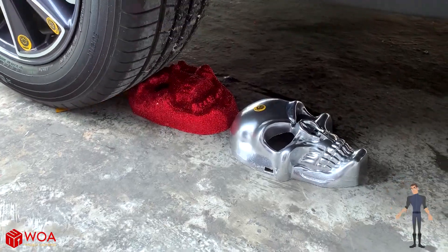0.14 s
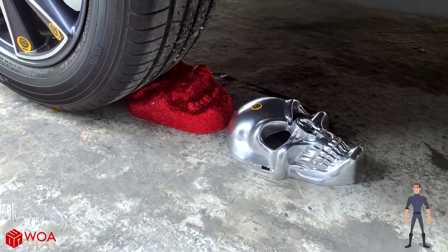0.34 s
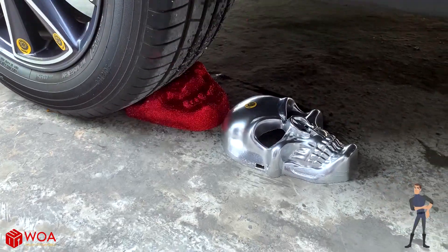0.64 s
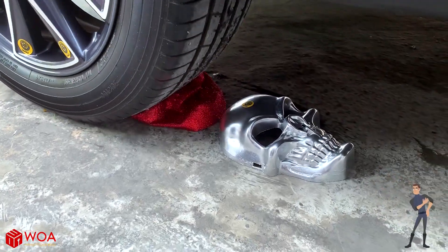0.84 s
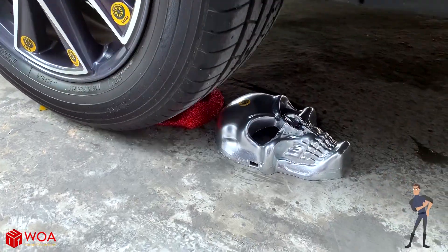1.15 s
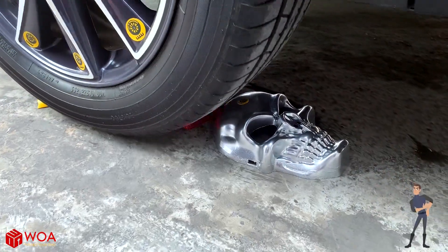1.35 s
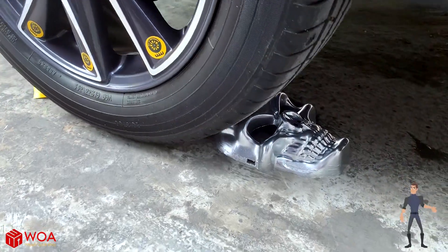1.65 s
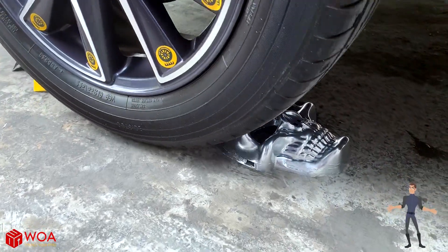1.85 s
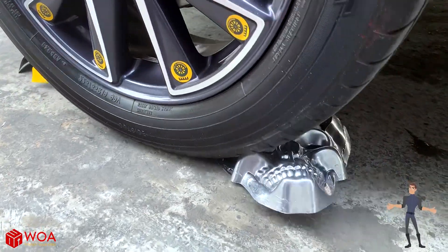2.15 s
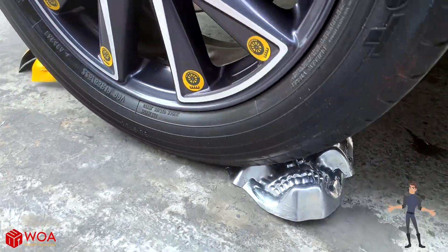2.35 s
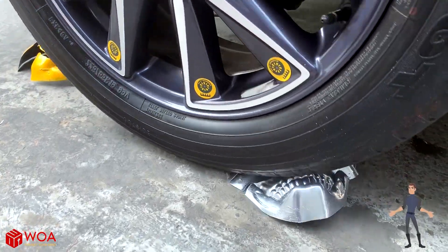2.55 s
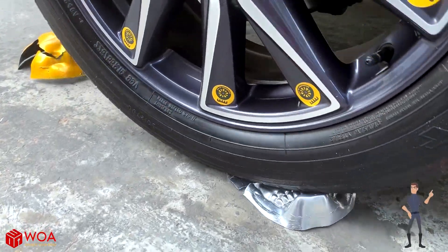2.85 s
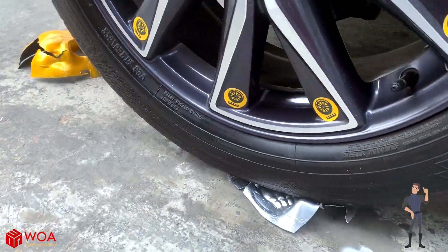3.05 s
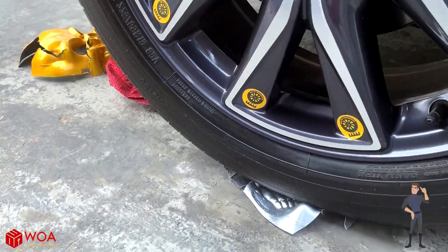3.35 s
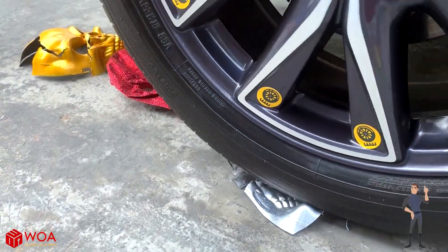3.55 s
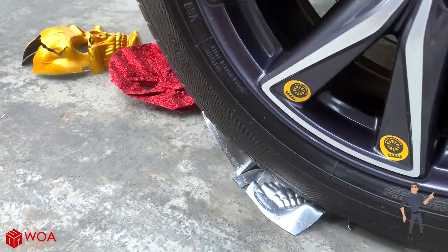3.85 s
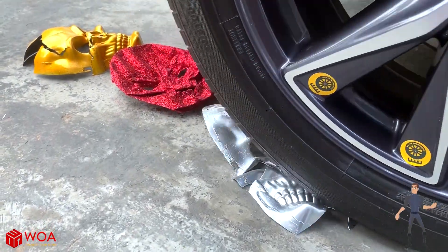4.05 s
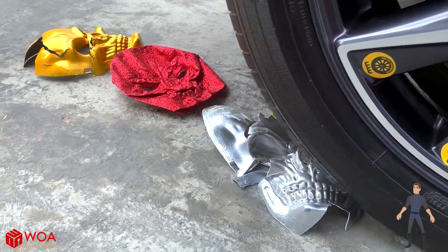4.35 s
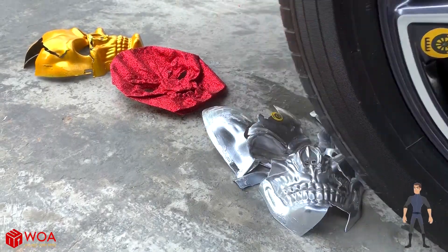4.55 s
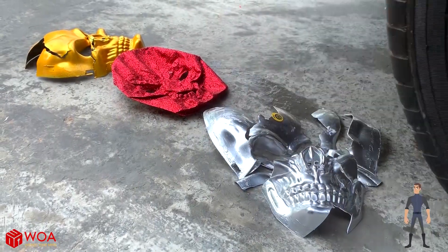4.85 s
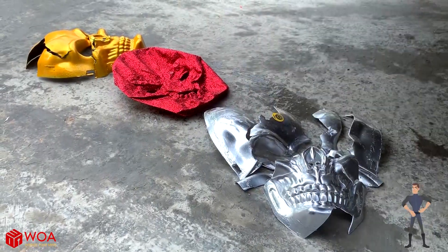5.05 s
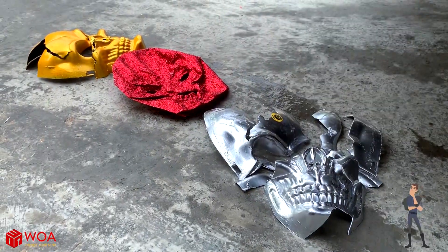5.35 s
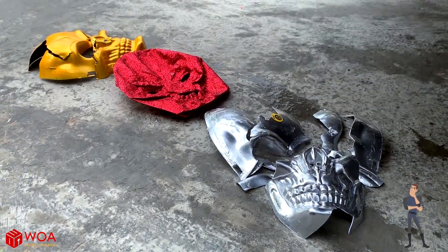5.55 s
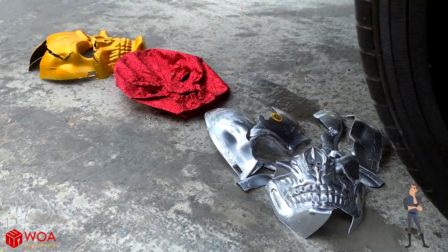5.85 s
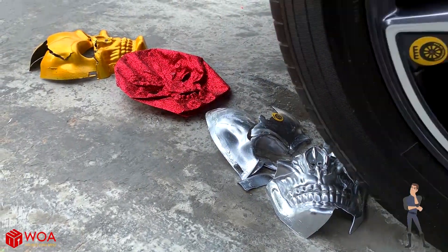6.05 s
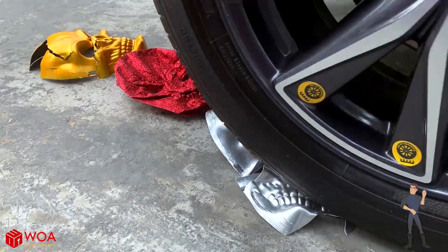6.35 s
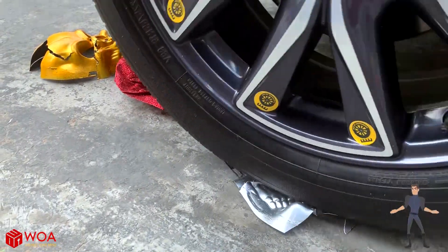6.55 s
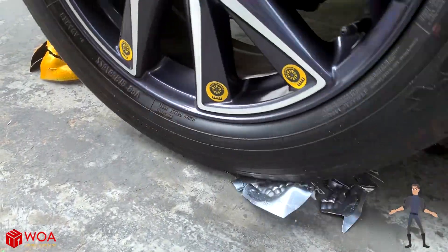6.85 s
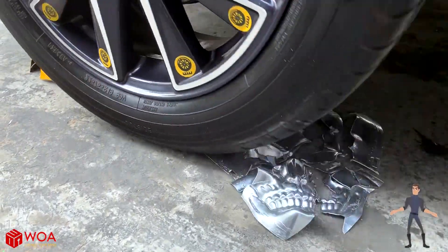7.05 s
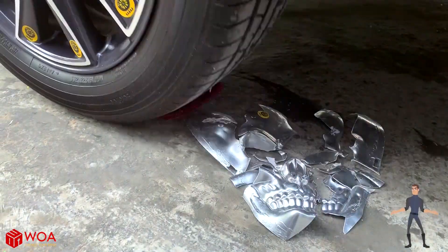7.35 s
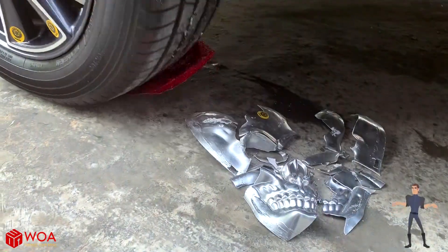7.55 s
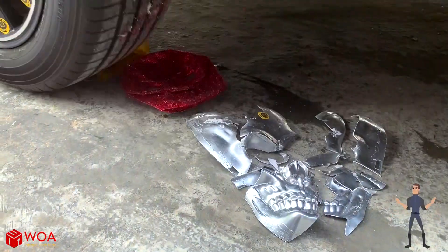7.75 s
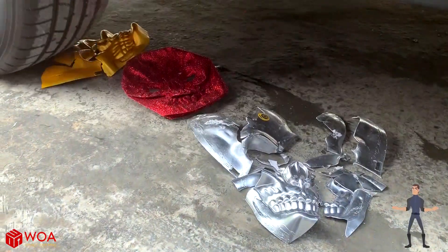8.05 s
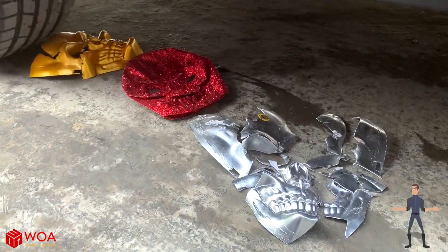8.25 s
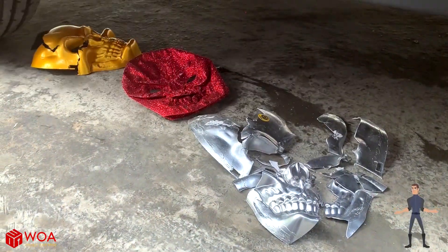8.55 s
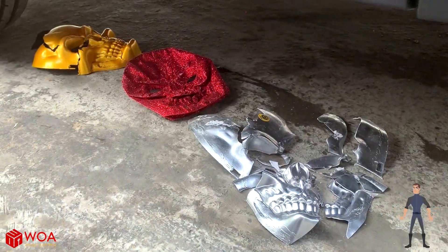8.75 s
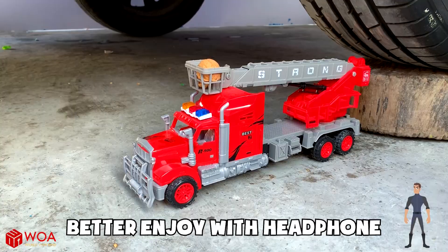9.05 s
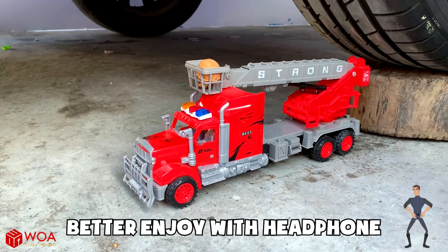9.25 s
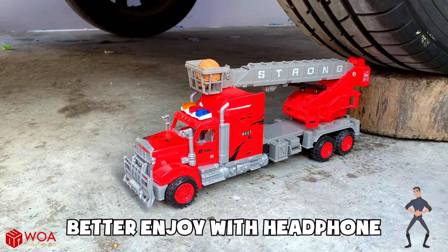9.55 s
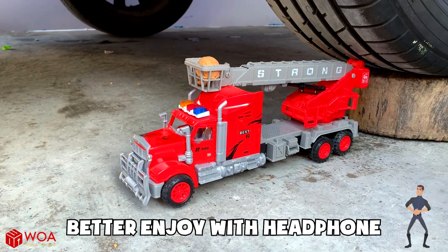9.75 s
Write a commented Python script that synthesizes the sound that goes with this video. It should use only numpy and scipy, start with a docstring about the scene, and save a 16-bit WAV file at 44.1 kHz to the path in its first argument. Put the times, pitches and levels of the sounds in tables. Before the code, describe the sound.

From 0 s a low pulsing car engine idles, rising slightly in speed, while a tyre presses hollow plastic close to the microphone: irregular pops, snaps and gritty crunching on concrete. At about 1.75 s the breaking surges, with dull collapsing thuds, a hollow tyre boom and loud, slightly overloaded cracks near 2 s. After a brief lull at 2.2 s, sharper splintering and crunching continue from 2.4 to 3.4 s. Then only sparse faint ticks remain to about 4.4 s as the engine recedes. It swells again from 5 s, with a soft low thud at 5.5 s. From 6.2 to 8 s the tyre reverses over flattened pieces: brighter crackles, grinding and short falling scrapes. The engine slows and fades around 8.3 s, with last small crumbs. At 9.03 s the level dips momentarily; quiet hiss, weak idle and a thin steady hum follow, with a faint crumble near 9.75 s.

```python
"""A car with its engine idling creeps over hollow plastic masks on a concrete floor, close by: damped rings and noise
bursts make shells snap and pop, random grains crunch under the tread, and a wavering tone booms in the tyre.
It pauses: the breaking thins out and the engine, a stack of firing harmonics over rumble, draws away and returns.
It reverses over the pieces, with brighter cracks and gliding scrapes, and the loudest peaks of the scene overload.
The engine slows and sags, the level dips briefly, a thin hum joins the hiss, and a last faint crumble follows."""
import sys
import numpy as np
from scipy import signal
from scipy.fft import rfft, irfft, next_fast_len
from scipy.io import wavfile
from scipy.ndimage import map_coordinates

SR = 44100
rng = np.random.default_rng(int(sys.argv[2]) if len(sys.argv) > 2 else 0)


def bounce(signal):
    """Save signal as a 16-bit WAV file at the path given by the first command-line argument."""
    frames = np.transpose(np.atleast_2d(signal))
    limited = np.clip(frames, -1, 1)
    pcm = np.round(limited * 32767).astype(np.int16)
    wavfile.write(sys.argv[1], SR, pcm)


N = 437472


def amp(db):
    """Decibels to gain."""
    return 10 ** (np.asarray(db) / 20)


def unit(x):
    """Scaled to rms 1."""
    return x / np.sqrt(np.mean(x ** 2) + 1e-20)


def along(points, hz):
    """(Hz, value) points read on a log frequency axis."""
    point_hz, value = np.transpose(points)
    return np.interp(np.log(hz + 1), np.log(point_hz + 1), value)


def curves(rows, outside=None):
    """One value per sample for each column after the time."""
    s, *columns = np.transpose(rows)
    return [np.interp(np.arange(N) / SR, s, column, outside, outside) for column in columns]


def wobble(rate):
    """A smooth random curve, rate knots a second."""
    knots = rng.standard_normal(int(N * rate / SR) + 4)
    return map_coordinates(knots, [np.arange(N) * rate / SR])


def filtered(x, response):
    """x times a response of frequency."""
    size = next_fast_len(N + 8192)
    return irfft(rfft(x, size) * response(np.fft.rfftfreq(size, 1 / SR)), size)[..., :N]


def coloured(x, spectrum):
    """x shaped by a (Hz, dB) spectrum, at rms 1."""
    return unit(filtered(x, lambda hz: amp(along(spectrum, hz))))


def pair(side_db):
    """White stereo noise with the given side level against the mid."""
    mid, side = rng.standard_normal((2, N))
    return unit(np.array([mid + amp(side_db) * side, mid - amp(side_db) * side]))


def burst(x):
    """Scaled to the energy of 10 ms at rms 1."""
    energy = np.sum(np.mean(np.atleast_2d(x) ** 2, axis=0))
    return x * np.sqrt(SR / 100 / (energy + 1e-20))


def add(track, s, x):
    """Mix x into the track from time s."""
    i = max(round(s * SR), 0)
    track[:, i:i + x.shape[-1]] += x[..., :N - i]


# background air: start_s, hiss_db, sizzle_db
AIR_LEVELS = [(0, -32, -81.5), (4.2, -51, -87.5), (5.37, -45.5, -93), (5.41, -57.5, -99),
              (5.66, -46.5, -93), (6.2, -43, -76.5), (8.4, -41.5, -67.5), (9.03, -42, -62.5),
              (9.07, -41.5, -57), (9.92, -41.5, -57.5)]
# colour of the hiss: freq_hz, density_db_per_hz
HISS_COLOUR = [(300, 11), (700, 4.5), (1100, 1), (2200, -1.5), (2950, -3.5), (3250, 0), (3600, -5),
               (5500, -9), (7400, -12), (9200, -7), (10500, -16), (12000, -47.5)]
# colour of the high sizzle: freq_hz, density_db_per_hz
SIZZLE_COLOUR = [(7000, -20), (9500, 4.5), (13000, 23), (15000, 18.5), (16000, -12.5)]
HUM_START_S, HUM_DB = 9.06, -49.5


def air(ticking=0.2):
    """A faint hiss and a high sizzle flutter at the engine's firing rate, joined at the end by a thin hum."""
    t = np.arange(N) / SR
    hiss, sizzle = curves(AIR_LEVELS)
    turns = np.cumsum(curves(FIRING_RATE)[0]) / SR
    flutter = pair(0.57) * (1 + ticking * np.cos(2 * np.pi * turns))
    hum = unit(np.sin(2 * np.pi * 597.5 * t + .3 * wobble(8)))
    noise = amp(hiss) * coloured(flutter, HISS_COLOUR) + amp(sizzle) * coloured(flutter, SIZZLE_COLOUR)
    return noise + amp(HUM_DB) * (t > HUM_START_S) * hum


# engine speed: start_s, firing_rate_hz
FIRING_RATE = [(0, 20.5), (.38, 22.1), (.6, 23.4), (5.7, 23.3), (6.3, 23.0), (7.9, 20.5), (8.45, 17.9),
               (8.95, 19.1), (9.2, 18.4), (9.92, 18.6)]
# the engine comes nearer and draws away: start_s, relative_level_db
ENGINE_LEVEL = [(0, -26), (.3, -26), (.8, -24.5), (1.8, -24), (2.4, -25), (3.2, -31), (4.0, -36.5),
                (5.4, -29.5), (5.7, -26), (6.4, -25.5), (6.95, -23.5), (7.6, -26.5), (8.3, -36),
                (8.55, -34), (8.95, -34.5), (9.2, -37.5), (9.92, -37)]
# firing harmonics: multiple of the firing rate, relative_level_db
HARMONICS = [(1, 1), (2, -4.5), (3, -4), (4, -13), (5, -7), (6, -11.5), (7, -18.5), (8, -19.5), (9, -23),
             (10, -27), (11, -24), (12, -30), (13, -38.5), (14, -27), (15, -24.5), (16, -25.5)]
# resonances that boom as a harmonic passes through, two in the exhaust and one in the air of the rolling tyre:
# centre_hz, half_width_hz, lift_db (added gain)
BOOMING_RESONANCES = [(95.66, 2.92, 12), (107.25, 3.8, 11.5), (185.4, 6, 5)]
# colour of the noise between the harmonics: freq_hz, density_db_per_hz
RUMBLE_COLOUR = [(12, -30), (30, -1), (110, 0), (150, -2), (250, -6), (400, -11), (600, -17), (1200, -28),
                 (4000, -55)]


def engine(throb_db=-2, rumble_db=-8, rolling_db=-3, floor_db=-40, unsteady_db=1.5, pulsing=0.19, smear=1.0):
    """Firing harmonics, lifted by the exhaust and tyre resonances, and a pulsing rumble that grows as the tyre
    labours."""
    level, = curves(ENGINE_LEVEL)
    rate = curves(FIRING_RATE)[0] * (1 + 0.0038 * wobble(11))
    phase = 2 * np.pi * np.cumsum(rate) / SR

    def tone(k):
        """One harmonic with its own phase and unsteady level."""
        return np.sqrt(2) * np.sin(k * phase + rng.normal(0, smear)) * amp(unsteady_db * wobble(5))

    def lift(hz):
        """Gain of the exhaust and tyre resonances at a frequency."""
        return 1 + sum(amp(db) / (1 + ((hz - centre) / width) ** 2) ** 2
                       for centre, width, db in BOOMING_RESONANCES)

    tones = amp(level + throb_db) * sum(amp(db) * lift(k * rate) * tone(k) for k, db in HARMONICS)
    rolling = amp(crush()[0] + rolling_db)
    rumble = np.sqrt(amp(level + rumble_db) ** 2 + rolling ** 2 + amp(floor_db) ** 2)
    noise = rumble * coloured(pair(-14) * (1 + pulsing * np.cos(phase)), RUMBLE_COLOUR)
    return (tones + noise) * amp([[-.7], [.7]])


# jolts that set the air in the tyre ringing: start_s, level_db (before swell and decay)
TYRE_JOLTS = [(.06, -27), (1.79, -24), (2.87, -19.5)]
# swell, decay, steady ring relative to the load
CAVITY_RISE_S, CAVITY_FALL_DB_PER_S, CAVITY_TREAD_DB = 0.015, 34, -21.5


def tyre(cavity_hz=198.3):
    """Jolts from the tread excite the ring of air inside the tyre, which swells and dies away."""
    t = np.arange(N) / SR
    ring = amp(crush()[0] + CAVITY_TREAD_DB)
    for s, db in TYRE_JOLTS:
        age = np.maximum(t - s, 0)
        jolt = amp(db - CAVITY_FALL_DB_PER_S * age) * (1 - np.exp(-age / CAVITY_RISE_S))
        ring = np.hypot(ring, jolt)
    boom = np.sin(2 * np.pi * cavity_hz * t + .3 * wobble(8)) * amp(1.2 * wobble(10))
    return ring * unit(boom)


# dull thuds as a dome collapses or the tyre settles: start_s, pitch_hz, burst_level_db, decay_s
THUDS = [(.228, 483, -10, .0023), (.399, 316, -17.5, .0028), (1.862, 584, -1.5, .0046),
         (1.962, 140, -8.5, .018), (1.98, 156.5, -12, .022), (2.005, 215, -10.5, .017),
         (2.634, 274, -18.5, .011), (2.789, 288, -23.5, .0068), (3.168, 298, -9, .0031),
         (5.53, 72, -19, .03)]


def thumps():
    """A collapsing dome or settling tyre gives a dull, quickly damped thud."""
    out, t = np.zeros((2, N)), np.arange(SR // 6) / SR
    for s, hz, db, decay_s in THUDS:
        swell = (1 - np.exp(-3 * t / decay_s)) * np.exp(-t / decay_s)
        add(out, s, amp(db) * burst(np.sin(2 * np.pi * hz * t) * swell))
    return out


# loose pieces skidding on the concrete: start_s, length_s, first_hz, last_hz, level_db
SKID_GLIDES = [(1.764, .03, 1370, 1150, -21.5), (2.901, .13, 851, 702, -27.5),
               (7.134, .089, 2600, 2000, -33), (7.344, 0.12, 1700, 1120, -31),
               (7.352, 0.079, 717, 471, -27), (7.841, 0.086, 2930, 2510, -43), (8.197, .06, 1060, 744, -46),
               (8.279, .07, 2400, 1960, -45), (8.315, .06, 1336, 1160, -47)]


def skids(width_hz=260):
    """A dragged piece rubs up a rough resonance that sinks as the piece unbends."""
    out = np.zeros((2, N))
    rub = filtered(pair(-4), lambda hz: 1 / (1 + (hz / width_hz) ** 2))
    for s, length_s, first_hz, last_hz, db in SKID_GLIDES:
        u = np.linspace(0, 1, round(length_s * SR))
        phase = 2 * np.pi * np.cumsum(first_hz * (last_hz / first_hz) ** u) / SR
        grit = rub[:, round(s * SR):][:, :len(u)]
        add(out, s, amp(db) * unit(grit * np.sin(phase) * np.sin(np.pi * u)))
    return out


# plastic crumbling and rubbing on the floor, one curve a bout: start_s, load_db, treble_db
CRUSH_BOUTS = [
    [(0, -22, -29), (.15, -26.5, -35), (.33, -29.5, -32.5), (.5, -26.5, -39), (.6, -25.5, -33),
     (.7, -33.5, -32), (.8, -23, -29.5), (.97, -29.5, -30.5), (1.12, -25, -27.5), (1.25, -25.5, -31.5),
     (1.43, -28.5, -32.5), (1.58, -31, -38.5), (1.74, -40.5, -28.5)],
    [(1.74, -29.5, -37.5), (1.88, -22, -24.5), (1.96, -15.5, -24.5), (2.06, -16.5, -22.5),
     (2.12, -33.5, -38.5), (2.26, -38.5, -47.5), (2.35, -31, -27)],
    [(2.35, -32, -44), (2.39, -27.5, -27.5), (2.5, -29, -28), (2.62, -16, -25.5), (2.71, -26.5, -21.5),
     (2.87, -21.5, -26.5), (3.02, -21.5, -39), (3.15, -28.5, -30.5), (3.27, -39, -35.5), (3.4, -54, -50.5),
     (3.55, -39.5, -49.5), (3.75, -45, -47.5), (3.95, -58.5, -57.5), (4.02, -45, -49.5),
     (4.25, -54.5, -68.5)],
    [(6.18, -52, -62), (6.28, -35, -43), (6.4, -32.5, -31.5), (6.5, -36, -45), (6.62, -34, -33.5),
     (6.77, -33, -33.5), (6.99, -29, -33), (7.18, -26, -33.5), (7.37, -28, -36.5), (7.48, -25.5, -40),
     (7.58, -30, -41.5), (7.76, -30, -45.5), (7.89, -28.5, -36.5), (8.0, -40.5, -49)],
    [(8.0, -39, -52), (8.16, -52, -62), (8.22, -39.5, -42), (8.26, -66, -58), (8.29, -39, -46),
     (8.35, -47, -48), (8.41, -58, -55)],
    [(9.72, -54, -63), (9.745, -32.5, -43.5), (9.775, -49, -58), (9.8, -32.5, -54.5), (9.87, -51.5, -63.5)],
]


def crush():
    """Load on the plastic and level of its treble, in dB for every sample."""
    return np.max([curves(bout, outside=-120) for bout in CRUSH_BOUTS], axis=0)


def creases(load, rate=170, pitch_hz=1250, spread=.5, cycles=1.6, spread_db=0.0, crease_db=-8.0):
    """Small dents click in and out, each at its own pitch."""
    count, t = int(rate * N / SR), np.arange(SR // 70) / SR
    at, tone, size = rng.random((count, 3)).T
    hz = pitch_hz * np.exp(spread * np.sqrt(3) * (2 * tone - 1))[:, None]
    sizes = amp(spread_db * np.minimum(-np.log(1 - size), 3.5))[:, None]
    clicks = sizes * np.sin(2 * np.pi * hz * t) * np.exp(-t * hz / cycles)
    where = (at * (N - len(t))).astype(int)[:, None] + np.arange(len(t))
    track = unit(np.bincount(where.ravel(), clicks.ravel(), N))
    return amp(load + crease_db) * track


# colour of the low pop, shared with the cracks: freq_hz, density_db_per_hz
POP_COLOUR = [(120, 4), (300, -4), (500, 9), (800, 10), (1300, 7), (1700, -2), (3000, -39.5)]
# colour of the middle snap, shared with the cracks: freq_hz, density_db_per_hz
SNAP_COLOUR = [(800, -7.5), (1400, 8.5), (1800, 8.5), (3000, 6), (4700, 3), (5600, -35), (8000, -41)]
# colour of the high splinters, shared with the cracks: freq_hz, density_db_per_hz
SPLINTER_COLOUR = [(3000, -18), (5000, 9), (7000, 6.5), (8300, 9), (10200, 3.5), (11400, -15.5),
                   (13000, -2.5), (15000, -20.5), (16500, -18.5)]


def crumbling(rate=330, spread_db=2.0, grain_s=0.003, rub=1.0, crunch_db=-6, crackle_db=-4, fizz_db=-1,
              slip_db=3.0):
    """Hundreds of grinding fragments a second, over the uneven rub of plastic on concrete."""
    load, treble = crush()
    sizes = (rng.random(N) < rate / SR) * amp(spread_db * np.minimum(rng.exponential(size=N), 3.5))
    grains = unit(signal.lfilter([1], [1, -np.exp(-1 / (SR * grain_s))], sizes))
    force = unit(grains + rub)

    def grind(colour, side_db):
        """Noise driven by the grinding force, slipping unevenly."""
        return unit(coloured(force * pair(side_db), colour) * amp(slip_db * wobble(35)))

    crunch = amp(load + crunch_db) * grind(POP_COLOUR, side_db=-7)
    crackle = amp(load + crackle_db) * grind(SNAP_COLOUR, side_db=0)
    fizz = amp(treble + fizz_db) * grind(SPLINTER_COLOUR, side_db=0.5)
    return creases(load) + crunch + crackle + fizz


# further fractures come by chance: most per second, then levels relative to the load or treble
LESSER_PER_S, LESSER_POP_DB, LESSER_SNAP_DB, LESSER_SPLINTER_DB = 22, 1.5, -1.5, 3
# shells that are already flat ring higher: from when, pitch ratio
FLAT_FROM_S, FLAT_PITCH = 4.5, 1.38
REFERENCE_LOAD_DB = -24  # the chance of fractures stops growing here


def lesser_cracks(load, treble, wall_hz=800, pitch_spread=0.37, spread_db=2.5, count=300):
    """Fractures drawn by chance, more and stronger as the load grows, as rows like those of PLACED_CRACKS."""
    at, luck = rng.random((count, 2)).T
    tone, pop, snap, splinter = rng.standard_normal((count, 4)).T
    i = ((np.arange(count) + at) / count * (N - 1)).astype(int)
    rate = LESSER_PER_S * np.minimum(amp(load[i] - REFERENCE_LOAD_DB), 1) ** .5
    flat_ratio = np.where(i / SR > FLAT_FROM_S, FLAT_PITCH, 1)
    pitch = wall_hz * np.exp(pitch_spread * np.clip(tone, -2, 2)) * flat_ratio
    rows = np.transpose([i / SR, pitch,
                         load[i] + LESSER_POP_DB + spread_db * pop,
                         load[i] + LESSER_SNAP_DB + spread_db * snap,
                         treble[i] + LESSER_SPLINTER_DB + spread_db * splinter])
    return list(rows[luck < rate * N / SR / count])


# shell fractures placed by hand, from loud cracks to faint ticks:
# start_s, wall_ring_hz, then relative burst levels pop_db, snap_db, splinter_db
PLACED_CRACKS = [(0.0681, 840, -6, -12, -3.5), (0.0788, 890, -5.5, -12.5, -12.5),
                 (.087, 460, -16, -20.5, -22), (.101, 333, -15, -25, -22), (.128, 790, -14.5, -32, -24),
                 (0.2062, 720, -13, -24, -59), (0.2273, 490, -13, -27, -45.5),
                 (0.2748, 890, -8.5, -11.5, -6.5), (0.5725, 940, -19, -14.5, -14.5),
                 (0.5918, 993, -5, -11.5, -10), (0.5974, 430, -15, -23, -23.5),
                 (0.6675, 460, -18, -33.5, -37.5), (0.743, 1010, -16.5, -10.5, -17.5),
                 (.7552, 780, -4, -16, -16), (0.7806, 512, -1.5, -19, -17), (0.796, 1370, -9.5, -12.5, -41),
                 (0.815, 700, -8, -13.5, -13.5), (.8548, 715, -10.5, -19.5, -24.5),
                 (0.8726, 810, -11, -14.5, -21.5), (0.908, 945, -18.5, -31, -37.5),
                 (.942, 567, -5.5, -16, -14), (1.0816, 1370, -18.5, -13, -14),
                 (1.1175, 1470, -11.5, -10.5, -21), (1.1705, 810, -11, -18.5, -32.5),
                 (1.2278, 1410, -7, -16, -22), (1.277, 1020, -15.5, -32, -22.5),
                 (1.4744, 575, -10.5, -13, -17.5), (1.5056, 545, -17, -34.5, -30),
                 (1.6107, 1430, -15, -20.5, -23), (1.692, 1290, -24.5, -18.5, -28.5),
                 (1.7342, 1050, -29, -17.5, -26.5), (1.7701, 970, -4.5, -12, -5.5),
                 (1.793, 1080, -13.5, -6.5, -10), (1.8118, 650, -9.5, -18, -1.5),
                 (1.861, 620, -7, -15, -14.5), (1.8716, 570, -17, -23, -5.5),
                 (1.8894, 870, -11, -27.5, -19.5), (1.9166, 670, -2.5, -11, -8),
                 (1.933, 585, -9.5, -19.5, -26.5), (1.9421, 1260, -8, -9, -12.5),
                 (2.0168, 878, -5, -13.5, -11), (2.029, 644, -5.5, -19, -7.5),
                 (2.041, 715, -11.5, -17, -8.5), (2.2205, 600, -23, -30, -51.5),
                 (2.2786, 690, -14.5, -19, -30), (2.3385, 633, -13, -15.5, -26.5),
                 (2.3814, 670, -29, -11.5, -15.5), (2.417, 1440, -22.5, -25, -13),
                 (2.478, 604, -23, -14, -13.5), (2.5499, 1260, -15, -12.5, -12),
                 (2.583, 1180, -25, -12, -5.5), (2.6372, 596, -17, -16, -10.5),
                 (2.6648, 625, -15.5, -16.5, -10), (2.727, 636, -27, -9.5, -9),
                 (2.7745, 1090, -19, -16.5, -11), (2.79, 606, -14, -20.5, -20.5),
                 (2.7983, 890, -11, -11.5, -13.5), (2.8327, 740, -11.5, -14, -3.5),
                 (2.88, 476, -30.5, -16, -11.5), (2.9176, 675, -19.5, -28, -17.5),
                 (2.9376, 700, -11, -20.5, -15), (2.9646, 664, -18.5, -19.5, -12.5),
                 (2.9789, 706, -17.5, -17, -17), (2.999, 1240, -10.5, -16.5, -8.5),
                 (3.034, 1280, -16.5, -23, -9.5), (3.0586, 710, -15, -15.5, -11),
                 (3.1569, 650, -9.5, -15, -12.5), (3.1668, 333, -8.5, -18, -10.5),
                 (3.2083, 715, -12, -21, -16.5), (3.296, 1190, -23, -19, -18),
                 (3.367, 860, -19.5, -26.5, -6.5), (3.3775, 950, -20.5, -20, -22),
                 (3.4187, 1360, -11, -23.5, -16), (3.519, 950, -37.5, -43, -38),
                 (3.5916, 1550, -42, -43, -43.5), (3.8613, 900, -50, -46, -44.5),
                 (3.9222, 1500, -36, -35.5, -39), (3.998, 1400, -28.5, -27, -25),
                 (4.19, 1000, -46, -51.5, -56.5), (4.347, 1460, -35.5, -53, -63),
                 (6.2275, 330, -55, -36, -42.5), (6.3472, 1300, -28.5, -25, -12.5),
                 (6.519, 865, -20.5, -23.5, -9.5), (6.5699, 1050, -14, -11, -10),
                 (6.6275, 1040, -15, -22, -18.5), (6.6699, 775, -14.5, -13.5, -14),
                 (6.698, 930, -15.5, -19, -13.5), (6.7718, 636, -18, -11, -4.5),
                 (6.87, 1450, -40, -25.5, -19.5), (6.901, 1005, -13.5, -12.5, -33),
                 (6.9168, 1420, -16.5, -12.5, -29), (7.0484, 1480, -21, -14.5, -26.5),
                 (7.2088, 1490, -16, -8.5, -13.5), (7.219, 1490, -13.5, -13, -23.5),
                 (7.302, 1034, -11.5, -10.5, -19), (7.309, 1066, -11.5, -8, -21.5),
                 (7.398, 1340, -18.5, -27, -34.5), (7.507, 1420, -21.5, -17.5, -39.5),
                 (7.6335, 1470, -20.5, -30.5, -36.5), (8.0482, 920, -20, -16, -27.5)]
# where the tread is breaking plastic: start_s, lag_samples (left channel behind right)
BREAKING_PLACE = [(0, 2.5), (1.3, 1), (1.7, -2.5), (3.4, -5.5), (6.3, -8), (6.8, 0), (7.1, 2.5), (8.1, 7)]
# a brittle break frees a smaller, higher rim: pitch when snap and splinter columns are equal,
# splinter excess that doubles it, limits before scatter, relative scatter
RIM_HZ, RIM_DB_PER_OCTAVE, RIM_LOW_HZ, RIM_HIGH_HZ, RIM_SCATTER = 2647, 18, 1845, 4050, .07
# a fracture tears longer under load: time scale at the reference load, load rise that doubles it, shortest
TEAR_S, TEAR_DB_PER_DOUBLING, SHORTEST_TEAR_S = 0.0029, 21, .002


def cracks(ring_s=0.0013, rim_cycles=3.2, attack_s=0.00056, flex_db=-4, grit_db=4, pop_db=0.0, snap_db=3,
           splinter_db=-0.5, lead_db=-14.5, lead_s=0.0027, rough_db=3, stagger=0.87, buckle=0.073):
    """A fracture creeps, then tears in tiny jerks; wall and rim ring, damped in a few cycles by the rubber."""
    out, start = np.zeros((2, N)), SR // 100
    t = (np.arange(SR // 20) - start) / SR
    age = np.maximum(t, 0)
    noise = [coloured(pair(-32), POP_COLOUR), coloured(pair(-4.5), SNAP_COLOUR),
             coloured(pair(-1.5), SPLINTER_COLOUR)]
    load, treble = crush()
    for s, wall_hz, pop, snap, splinter in PLACED_CRACKS + lesser_cracks(load, treble):
        rim_hz = RIM_HZ * 2 ** ((splinter - snap) / RIM_DB_PER_OCTAVE)
        rim_hz = np.clip(rim_hz, RIM_LOW_HZ, RIM_HIGH_HZ) * np.exp(rng.normal(0, RIM_SCATTER))
        excess_db = load[int(s * SR)] - REFERENCE_LOAD_DB
        tear_s = max(TEAR_S * 2 ** (excess_db / TEAR_DB_PER_DOUBLING), SHORTEST_TEAR_S)
        i = min(round(s * SR), N - len(t))
        flex, grit, shard_noise = (x[:, i:i + len(t)] for x in noise)

        # the creep leads in before the break, and jerks roughen both creep and tear
        jerks = amp(rough_db * np.interp(t, np.linspace(t[0], t[-1], num=64), rng.standard_normal(size=64)))
        creep = amp(lead_db) * np.exp(-np.abs(t) / lead_s)
        opening = (1 - np.exp(-(age / (0.25 * tear_s)) ** 2)) * np.exp(-age / (0.54 * tear_s))
        tear = jerks * (creep + opening)

        wall_decay_s = ring_s * (800 / wall_hz) ** .5 + 0.42 * tear_s
        swing = (1 - np.exp(-age / attack_s)) * np.exp(-age / wall_decay_s)
        # a buckling shell cannot hold its pitch
        drift = buckle * np.cumsum(rng.standard_normal(len(t)) * (t > 0))
        wall = burst(swing * (np.sin(2 * np.pi * wall_hz * age + drift / 2) + amp(flex_db) * flex))

        rim_phase = 2 * np.pi * rim_hz * age + 2 * drift + stagger * rng.standard_normal((2, 1))
        rim_swing = (1 - np.exp(-2 * age / attack_s)) * np.exp(-age / (rim_cycles / rim_hz + 0.17 * tear_s))
        rim = burst(burst(np.sin(rim_phase) * rim_swing) + amp(grit_db) * burst(tear * grit))
        shards = burst(tear * shard_noise) * amp([[-1], [1]])

        body = amp(pop + pop_db) * wall + amp(snap + snap_db) * rim
        left, right = body + amp(splinter + splinter_db) * shards
        lag = round(np.interp(s, *np.transpose(BREAKING_PLACE)) + rng.normal(0, 0.78))
        add(out, s - start / SR, np.array([np.roll(left, lag), right]) * amp([[.4], [-.4]]))
    return out


def nearby(x, echo_db=-20.0, count=6):
    """Floor, rim and wheel arch send back weak copies within a few milliseconds."""
    delays = rng.uniform(.0008, .012, (2, count))
    copies = [sum(rng.choice([-1, 1]) * np.roll(side, round(d * SR)) for d in row)
              for side, row in zip(x, delays)]
    return x + amp(echo_db) * np.array(copies)


# decay of the surroundings: freq_hz, t60_s
ROOM_DECAY = [(150, 0.75), (700, 0.32), (3000, 0.52), (8000, 0.25), (15000, 0.47)]


def room(x, count=4):
    """Walls and underbody answer with decaying noise; successive tenths of a second take turns on a few tails."""
    wet, t = np.zeros((2, N)), np.arange(N) / SR
    for k in range(count):
        hz, age, z = signal.stft(rng.standard_normal((2, SR // 2)), SR, nperseg=256)
        decay = amp(-60 * age / along(ROOM_DECAY, hz)[:, None])
        tail = signal.istft(z * decay, SR, nperseg=256)[1]
        build_up = 1 - np.exp(-np.arange(tail.shape[1]) / SR / 0.0015)
        tail = (tail + 0.36 * tail[::-1]) * build_up  # each side leaks into the other
        part = x * (np.floor(t * 10) % count == k)
        wet += signal.fftconvolve(part, tail / np.linalg.norm(tail[0]), axes=1)[:, :N]
    return wet


def scene(room_db=-10):
    """Breaking plastic in front of the idling car."""
    background = air() + engine() + tyre() + thumps()
    breaks = skids() + cracks()
    return background + nearby(breaks + crumbling()) + amp(room_db) * room(breaks)


TOP_HZ = 15700  # band limit


def record(dry):
    """Peaks flatten at full scale, the level dips briefly once, and nothing is kept above the band limit."""
    clipped = dry / (1 + np.abs(dry) ** 8) ** (1 / 8)
    dip = curves([(9.025, 1), (9.037, .15), (9.05, .15), (9.06, 1)])[0]  # start_s, gain
    return filtered(clipped * dip, lambda hz: hz < TOP_HZ)


dry = scene()
out = record(dry)
bounce(out)
```